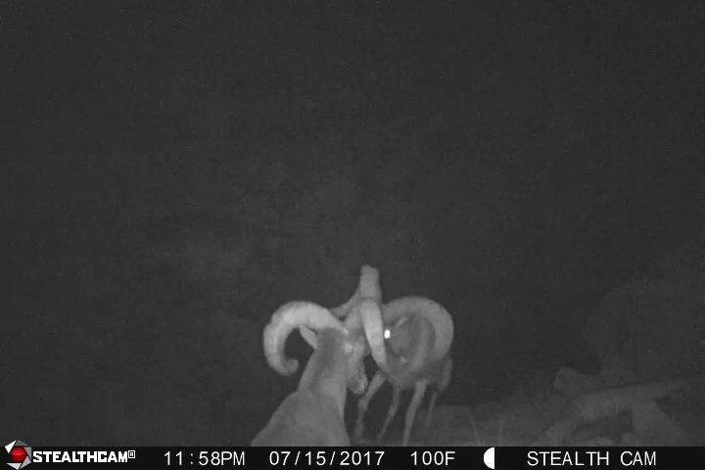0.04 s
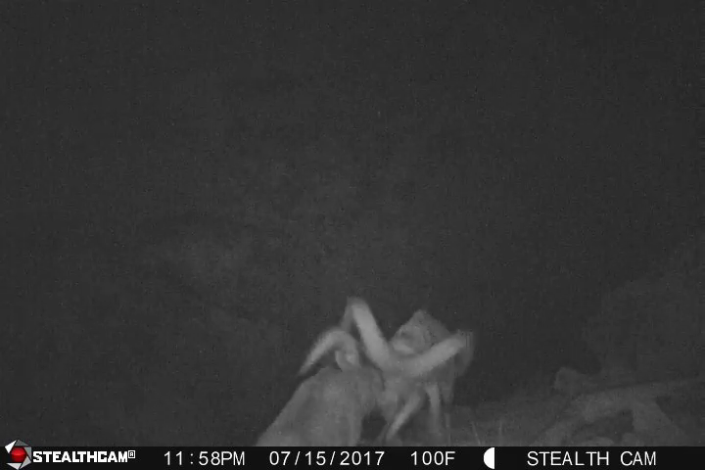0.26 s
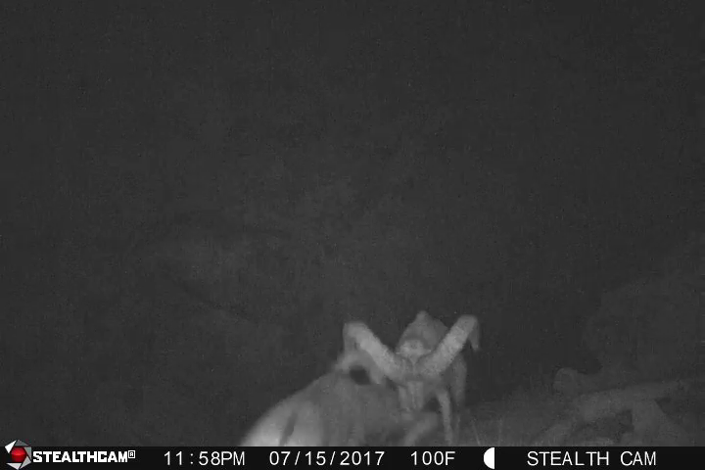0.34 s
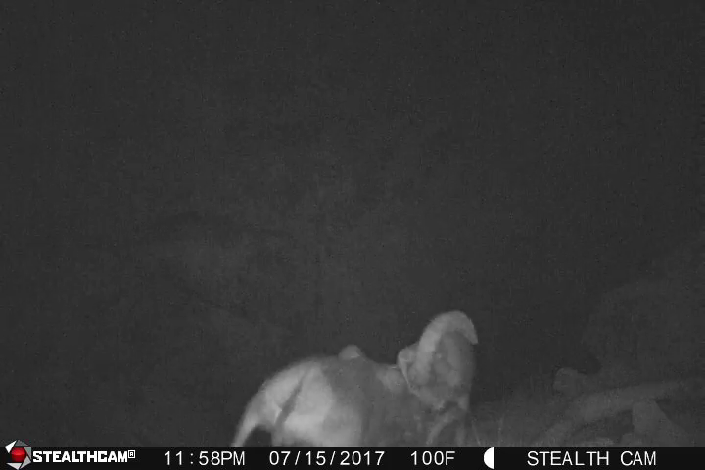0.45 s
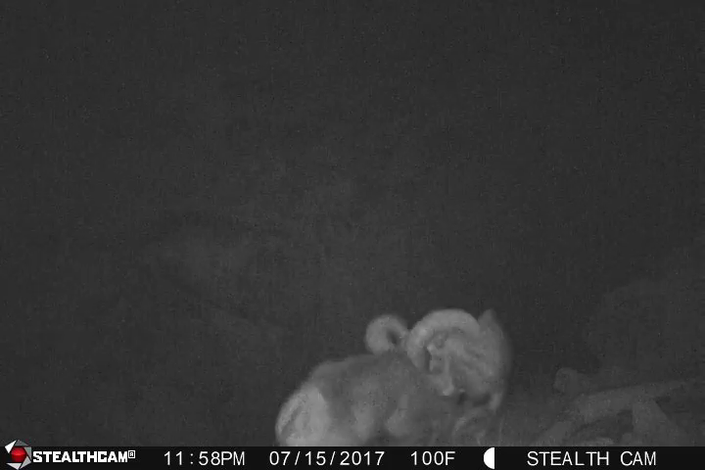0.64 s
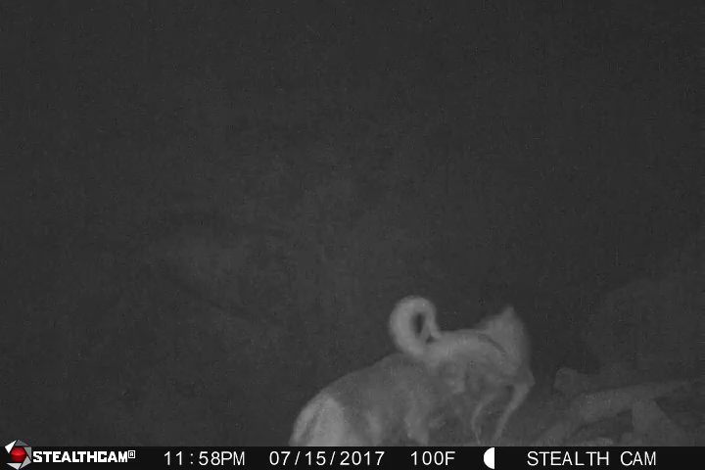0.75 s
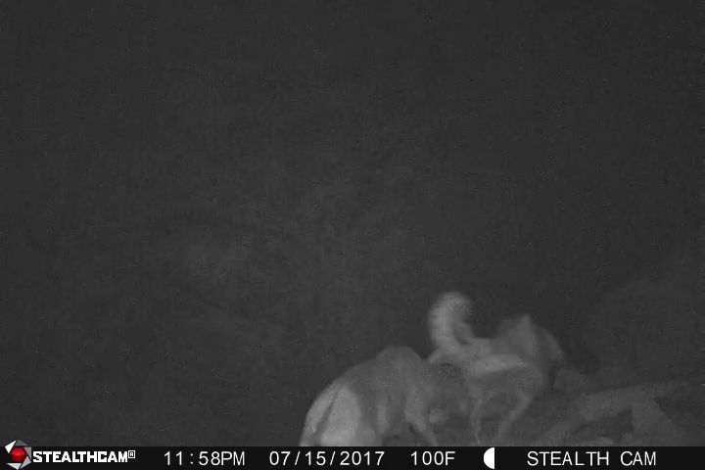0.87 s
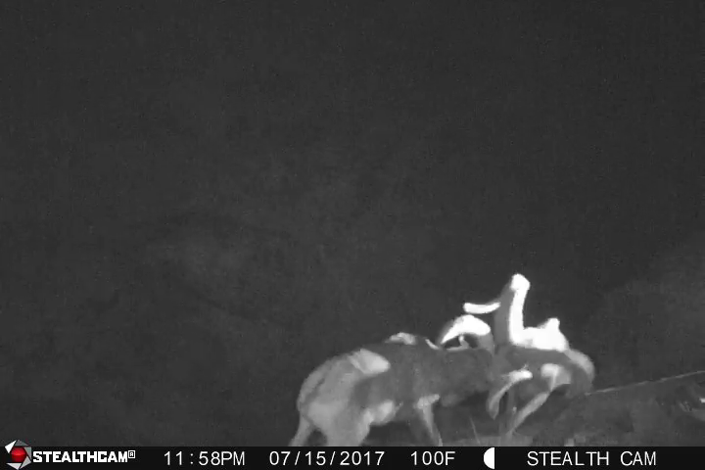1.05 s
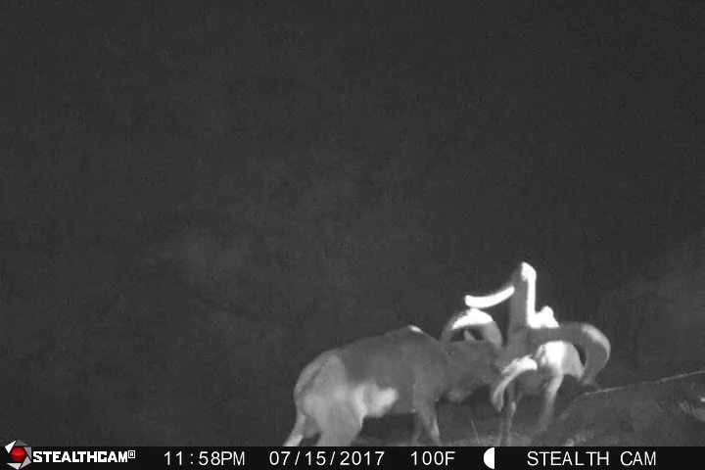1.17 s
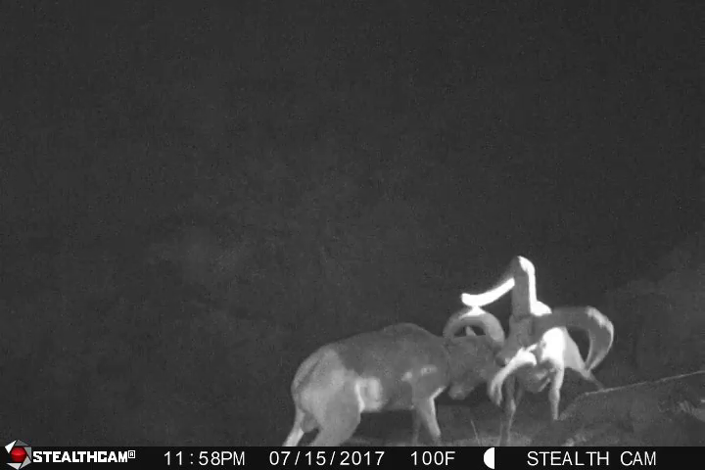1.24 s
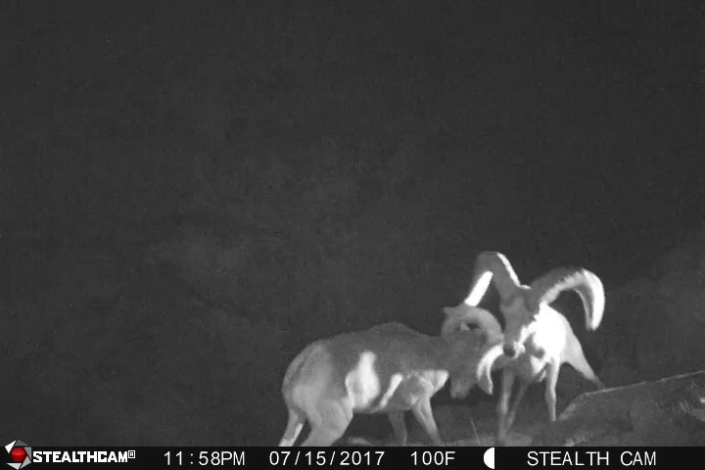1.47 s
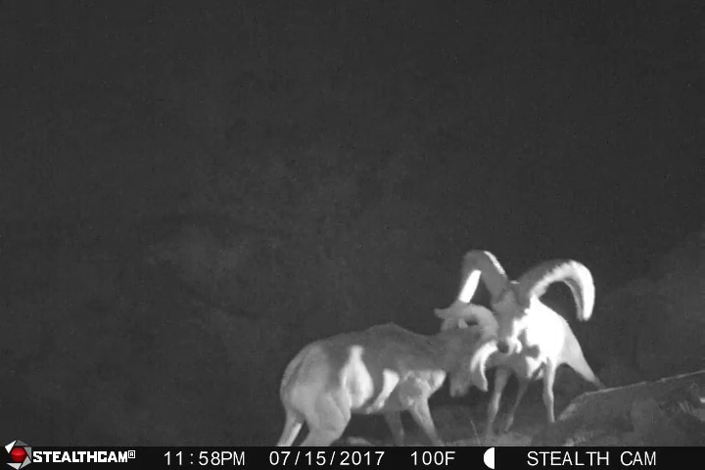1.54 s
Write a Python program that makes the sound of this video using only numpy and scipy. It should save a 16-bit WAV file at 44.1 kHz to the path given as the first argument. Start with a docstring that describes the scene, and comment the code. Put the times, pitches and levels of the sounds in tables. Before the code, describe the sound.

Two rams crack horns loudly, then their horns rattle and hooves scuffle on rocky ground.

```python
"""Two wild rams butt heads: their hollow horns meet in a double crack, then rattle together.
The crack is loud enough to overload the microphone. Around it, hooves knock on rock, tip loose
stones, scuff through gravel and thump the ground, and one clangs on metal. The rocky slope throws
back short echoes of the cracks and knocks, over the faint hiss of still night air."""
import sys
import numpy as np
from scipy import signal
from scipy.fft import rfft, irfft
from scipy.io import wavfile
from scipy.ndimage import uniform_filter1d

SR = 44100
rng = np.random.default_rng(int(sys.argv[2]) if len(sys.argv) > 2 else 0)


def output_pcm(signal):
    """Save a mono or channel-first signal as 16-bit PCM at the path in sys.argv[1].

    Samples are clipped to [-1, 1] before scaling.
    """
    pcm = np.clip(np.atleast_2d(signal).T, -1, 1) * 32767
    wavfile.write(sys.argv[1], SR, np.round(pcm).astype(np.int16))


N = 70560
T = np.arange(N) / SR
HZ = np.fft.rfftfreq(2 * N, 1 / SR)
MIC_TOP_HZ = 5800  # the microphone picks up little above this


def amp(db):
    """Turn decibels into a number to multiply by."""
    return 10 ** (np.asarray(db) / 20)


def unit(x):
    """Scale a sound to an average (rms) level of 1."""
    return x / np.sqrt(np.mean(x ** 2) + 1e-20)


def curve_at(points, hz):
    """Read between the rows of a (pitch, value) table, with octaves evenly spaced."""
    pitches, values = np.transpose(points)
    return np.interp(np.log(hz + 1), np.log(pitches + 1), values)


def fade(t, fade_s):
    """Die away by 60 dB in fade_s seconds; fade_s means this in every table."""
    return np.exp(-np.log(1000) * np.maximum(t, 0) / max(fade_s, 1e-4))


def add(mix, start_s, sound):
    """Mix a sound in at its start time."""
    part = mix[max(round(start_s * SR), 0):][:len(sound)]
    part += sound[:len(part)]


def colour(x, gain):
    """Change the tone of a sound, with one gain for each pitch in HZ."""
    return irfft(rfft(x, 2 * N) * gain)[:N]


def band(hz, centre_hz, octaves):
    """A broad hump of gain that drops to half at `octaves` either side of its centre."""
    return 1 / (1 + (np.log2((hz + 1) / centre_hz) / octaves) ** 2)


def click(gain, size=1024):
    """The sharpest click that has the given gain at each pitch, with a peak of 1."""
    cepstrum = irfft(np.log(np.maximum(gain, 1e-5)))
    cepstrum[1:size] *= 2  # folding this onto its first part packs the energy at the start
    cepstrum[size + 1:] = 0
    pulse = irfft(np.exp(rfft(cepstrum)))[:size]
    return pulse / abs(pulse).max()


def night_air(hiss_db=-58, hum_hz=134, hum_db=-70.5):
    """Still air and microphone hiss make a steady bed, with a faint low hum."""
    # tone of the hiss: pitch_hz, gain_db
    tone = [(20, 3), (45, 2), (110, -3.5), (220, -10.5), (450, -16.5), (900, -16.5), (1800, -23.5),
            (3500, -25), (4600, -24.5), (5500, -24.5)]
    hiss = unit(colour(rng.standard_normal(N), amp(curve_at(tone, HZ))))
    return amp(hiss_db) * hiss + amp(hum_db) * np.sin(2 * np.pi * hum_hz * T)


def rock_echoes(sound, build_s=0.02):
    """Nearby rocks send back single echoes; the whole slope adds a short, blurred tail."""
    # tail from the rocks all around: pitch_hz, level_db, fade_s
    slope = [(59.4, -17, 0.42), (200, -17.5, 0.56), (650, -19.5, 0.26), (1300, -16.5, 0.31),
             (3000, -13.5, 0.31), (5100, -16.5, 0.27)]
    # echoes off the nearest rocks: delay_s, level_db
    echoes = [(.0031, -17.5), (.0058, -14), (.0104, -20.5), (.0215, -24)]
    hz, t, spectrum = signal.stft(rng.standard_normal(N), SR, nperseg=256)
    level_db = curve_at(np.array(slope)[:, [0, 1]], hz)[:, None]
    fade_s = curve_at(np.array(slope)[:, [0, 2]], hz)[:, None]
    fade_rate = np.log(1000) / fade_s
    same_energy = np.sqrt(2 * fade_rate / SR)  # a longer tail starts quieter
    spectrum *= amp(level_db) * np.exp(-fade_rate * t) * same_energy
    tail = signal.istft(spectrum, SR, nperseg=256)[1][:N] * np.minimum(T / build_s, 1)
    for delay_s, echo_db in echoes:
        add(tail, delay_s, amp([echo_db]))
    return signal.fftconvolve(sound, tail)[:N]


def ground_thumps(rise_s=0.0016):
    """The rams' weight lands on the ground with a dull, low note."""
    # heavy footfalls: start_s, level_db, pitch_hz, fade_s
    footfalls = [(0.563, -35.5, 207, .08), (0.727, -31.5, 84.5, 0.11), (.748, -35.5, 127, 0.056),
                 (.762, -38.5, 129, 0.091), (0.802, -49, 78, 0.06), (0.957, -45.5, 143.7, 0.37)]
    out, t = np.zeros(N), T[:SR // 2]
    for start_s, level_db, pitch_hz, fade_s in footfalls:
        loudness = amp(level_db) * np.minimum(t / rise_s, 1) * fade(t, fade_s)
        add(out, start_s, loudness * np.sin(2 * np.pi * pitch_hz * t))
    return out


def gravel(size, grains_per_s=2500, spread_db=4.5, sand_gain=0.11, jerk_s=0.0028, jerk_db=1.73):
    """Gravel gives way in little jerks: many tiny, uneven hits over a hiss of sand."""
    hits = (rng.random(size) < grains_per_s / SR) * rng.choice([-1, 1], size)
    grains = hits * amp(spread_db * np.minimum(rng.exponential(1, size), 3))
    jerks = unit(uniform_filter1d(rng.standard_normal(size), round(jerk_s * SR)))
    sand = sand_gain * rng.standard_normal(size)
    return unit((unit(grains) + sand) * amp(jerk_db * np.clip(jerks, -2, 2)))


def gravel_scuffs():
    """Weight thuds into the ground while stones and grit grind under the hoof."""
    # hooves pushing through gravel: start_s, rise_s, hold_s, fade_s, thud_db, stones_db, grit_db
    scuffs = [(0, 0.001, 0.017, 0.14, -56, -42, -41), (0.09, 0.0084, 0.021, 0.29, -54, -48.5, -52.5),
              (0.214, .0049, 0.069, 0.46, -37, -31, -38), (0.517, 0.016, 0.035, 0.11, -65, -47, -42.5),
              (.556, 0.036, 0.067, 0.24, -38.5, -39.5, -47.5),
              (0.682, 0.026, 0.015, 0.017, -59, -49, -47.5), (0.731, .0038, 0.046, 0.32, -53.5, -57, -56.5),
              (.803, 0.0032, 0.018, 0.089, -42, -41.5, -33), (0.826, 0.024, 0.052, 0.6, -58, -48.5, -48),
              (1.268, .017, .014, .09, -70.5, -65.5, -58), (1.418, .005, 0.021, .08, -76, -64, -62),
              (1.567, .008, 0.041, 0.091, -62, -62.5, -55.5)]
    # tone of the low thud: pitch_hz, gain_db
    thud = [(20, -16.5), (50, -11.5), (85, -4), (150, -3.5), (240, -5.5), (400, -17.5), (900, -43)]
    # tone of the grinding stones: pitch_hz, gain_db
    stones = [(80, -19), (200, -5), (400, 4), (650, 1), (950, -3.5), (1600, -16.5), (3000, -27),
              (6000, -35)]
    # tone of the bright grit: pitch_hz, gain_db
    grit = [(200, -27), (700, -9.5), (1300, 2), (2300, 0), (3600, -7), (4900, -1), (6000, -6)]
    sources = [(rng.standard_normal(N), thud), (gravel(N), stones), (gravel(N), grit)]
    layers = [unit(colour(noise, amp(curve_at(tone, HZ)))) for noise, tone in sources]
    out = np.zeros(N)
    for start_s, rise_s, hold_s, fade_s, *levels_db in scuffs:
        t = T - start_s
        loudness = np.clip(t / rise_s, 0, 1) * fade(t - rise_s - hold_s, fade_s)
        out += loudness * sum(amp(db) * layer for db, layer in zip(levels_db, layers))
    return out


def stone_clacks():
    """A loose stone tips and rings with a hollow clack, lower when it is larger."""
    # notes a stone rings with: pitch_hz, level_db, fade_s
    notes = [(807, 1.5, 0.031), (1090, -6, 0.041), (1580, -6, 0.027), (1746, -3.5, .035),
             (2230, -1.5, 0.01)]
    # stones tipping: start_s, level_db, pitch_ratio
    clacks = [(.047, -42, 1), (.055, -39.5, 0.98), (.5878, -35, .9), (1.294, -49, 0.99), (1.3008, -46, 1),
              (1.461, -54.5, 0.791), (1.573, -58, 1), (1.598, -56, 0.97)]
    out, t = np.zeros(N), T[:SR // 8]
    for start_s, level_db, pitch_ratio in clacks:
        ring = sum(amp(db) * fade(t, fade_s) * np.sin(2 * np.pi * hz * pitch_ratio * t)
                   for hz, db, fade_s in notes)
        add(out, start_s, amp(level_db) * ring)
    return out


def metal_clang(start_s=0.8032):
    """A hoof strikes sheet metal: a short clang, with a few notes that ring on."""
    # notes the metal rings with: pitch_hz, level_db, fade_s
    notes = [(247, -40.5, 0.13), (331, -37.5, 0.13), (396, -39.5, 0.45), (507, -47.5, 1.15),
             (950, -52, 0.62), (1123, -35.5, 0.13), (1296, -34, 0.078), (1510, -43, 0.44),
             (1743, -36.5, 0.16), (1996, -57, 0.54), (2355, -34.5, 0.098), (2830, -46.5, 0.43),
             (3190, -45.5, .2)]
    out = np.zeros(N)
    for hz, db, fade_s in notes:
        add(out, start_s, amp(db) * fade(T, fade_s) * np.sin(2 * np.pi * (hz * T + rng.random())))
    return out


def hoof_knocks(soft_hz=2480, treble_hz=5600, grit_db=-5.5, size=4096):
    """Each hoof clicks on rock and crushes a little grit."""
    # hoof on stone: start_s, level_db, centre_hz, treble_db
    knocks = [(.007, -23.5, 890, -25.5), (0.0157, -27.5, 980, -22.5), (0.023, -25.5, 1000, -11),
              (0.04, -24, 1360, -8), (.047, -18.5, 920, -14.5), (.055, -12.5, 960, -9.5),
              (.0605, -31, 756, -26), (0.1599, -26, 2220, -6.5), (0.186, -28.5, 820, -8),
              (0.1946, -29, 790, -11), (0.2942, -21.5, 1600, -6), (0.3555, -27, 1390, -15),
              (.383, -42, 2000, -6.5), (0.3992, -31.5, 1700, -6), (.467, -40, 2040, 5.5),
              (.502, -33.5, 2190, 1), (.5265, -33, 2870, -1), (.534, -29.5, 2530, 7),
              (0.5515, -36, 2400, -3), (0.5575, -27, 2400, 2), (0.5882, -23, 1410, -18),
              (0.6168, -38, 1980, 5), (0.631, -33, 2400, 3), (0.671, -34, 1400, -5), (0.8056, -22, 1730, 5),
              (0.9001, -28, 1760, 3), (1.036, -43, 1500, -21.5), (1.212, -49, 2015, -10),
              (1.276, -43, 1494, -15.5), (1.294, -34.5, 1725, -9), (1.3005, -31.5, 2030, 1.5),
              (1.409, -51, 1300, -16), (1.4605, -37, 1150, -7), (1.573, -41.5, 1077, -11),
              (1.598, -35, 1200, -5)]
    out, hz, t = np.zeros(N), np.fft.rfftfreq(size, 1 / SR), T[:size]
    for start_s, level_db, centre_hz, treble_db in knocks:
        # a hoof is soft, so the body of its click falls away above soft_hz
        body = band(hz, centre_hz, octaves=0.86) / np.sqrt(1 + (hz / soft_hz) ** 10)
        treble = amp(treble_db) * band(hz, treble_hz, octaves=0.37)
        tone = (body + treble) / (1 + (hz / MIC_TOP_HZ) ** 10)
        grit = gravel(size) * fade(t, fade_s=0.013)
        push = amp(grit_db) * grit / np.linalg.norm(grit)
        push[0] += 1  # the strike itself
        add(out, start_s, amp(level_db) * signal.fftconvolve(push, click(tone)))
    return out


def horn_cracks(size=2048):
    """Hard ridges on the horns catch and slip, making short, bright bursts of noise."""
    # ridges snapping past each other: start_s, level_db, centre_hz, fade_s
    cracks = [(0.2218, -1.5, 5100, 0.013), (0.2247, -11.5, 4900, 0.012), (0.2256, -14, 1790, 0.028),
              (0.2372, -12.5, 2400, .016), (0.24, -7, 1420, .03), (0.2487, -22, 5000, 0.014),
              (.275, -19, 2400, 0.013), (0.293, -21.5, 1620, 0.072), (0.3543, -22, 1410, 0.029)]
    out, hz = np.zeros(N), np.fft.rfftfreq(size, 1 / SR)
    for start_s, level_db, centre_hz, fade_s in cracks:
        tone = band(hz, centre_hz, octaves=0.55) ** 2
        burst = unit(irfft(tone * np.exp(2j * np.pi * rng.random(len(hz)))))
        add(out, start_s, amp(level_db) * burst * fade(T[:size], fade_s))
    return out


def horn_blows(contact_s=0.0006, longer_per_db=0.18, bass_cut_hz=102):
    """Each blow rings the hollow horns with a short, woody note."""
    # horn hitting horn: start_s, level_db, pitch_ratio, length_ratio
    blows = [(.2166, 7, 0.86, 0.6), (.2234, -1, 0.97, 0.54), (.2392, 2.5, 0.96, 0.98),
             (0.2451, -7.5, 0.96, 0.37), (0.2607, -5, 1.06, 0.44), (.274, -9.5, 1.04, 0.61),
             (.287, -17, 1.4, 0.92), (.2955, -10, 1.06, 0.87), (.316, -15.5, 0.85, 1.3),
             (.342, -21.5, 0.96, 3.1), (.402, -18.5, 1.028, 0.8), (.4895, -28, 1.02, 0.68),
             (.497, -31.5, 1.1, 0.49), (.654, -27, 0.98, 1.2), (.894, -32.5, 1.18, 1.06),
             (.957, -36, 1.25, 1.4)]
    # notes a horn rings with: pitch_hz, level_db, fade_s
    notes = [(136, -27, 0.14), (276, -35, 0.058), (427, -30.5, 0.037), (505, -19.5, .06), (574, -14.5, .05),
             (677.2, -0.5, .033), (765, -18.5, .06), (1022.6, -15, 0.047), (1400, -13.5, 0.025),
             (1720, -17.5, .027), (2090, -25.5, 0.01)]
    out, t = np.zeros(N), T[:SR // 8]
    for start_s, level_db, pitch_ratio, length_ratio in blows:
        touch_s = contact_s * np.exp(-longer_per_db * level_db)  # a lighter blow takes longer to build
        swell = 1.5 - np.exp(-(t / touch_s) ** 2)
        ring = sum(amp(db) * fade(t, fade_s * length_ratio) * np.sin(2 * np.pi * hz * pitch_ratio * t)
                   for hz, db, fade_s in notes)
        add(out, start_s, amp(level_db) * swell * ring)
    # a horn is too small to give off deep bass
    return signal.lfilter(*signal.butter(1, bass_cut_hz, "high", fs=SR), out)


def scene():
    """Horns and hooves among the rocks, in one channel; only the sharp hits echo."""
    hits = horn_blows() + horn_cracks() + hoof_knocks() + stone_clacks()
    return (hits + rock_echoes(hits) + gravel_scuffs() + ground_thumps() + metal_clang() + night_air())[None]


def record(dry, ceiling=0.7, hardness=8, harsh_hz=5000, harsh_cut_db=5, edge_width_hz=222, offset=0.0067):
    """The microphone loses the high treble, flattens the loudest peaks and adds a small steady offset."""
    heard = colour(dry[0], 0.5 - 0.5 * np.tanh((HZ - MIC_TOP_HZ) / edge_width_hz))
    flattened = heard / (1 + abs(heard / ceiling) ** hardness) ** (1 / hardness)
    harsh_range = 0.5 + 0.5 * np.tanh((HZ - harsh_hz) / edge_width_hz)
    dulled = colour(flattened, amp(-harsh_cut_db * harsh_range))  # softens the overload's overtones
    top_cut = signal.firwin(255, cutoff=16000, window=("kaiser", 9), fs=SR)
    return offset + signal.oaconvolve(dulled, top_cut, "same")[None]


dry = scene()
out = record(dry)
output_pcm(out)
```